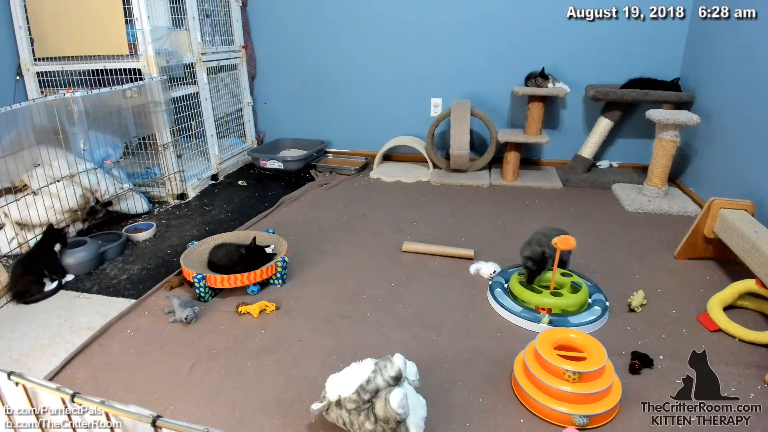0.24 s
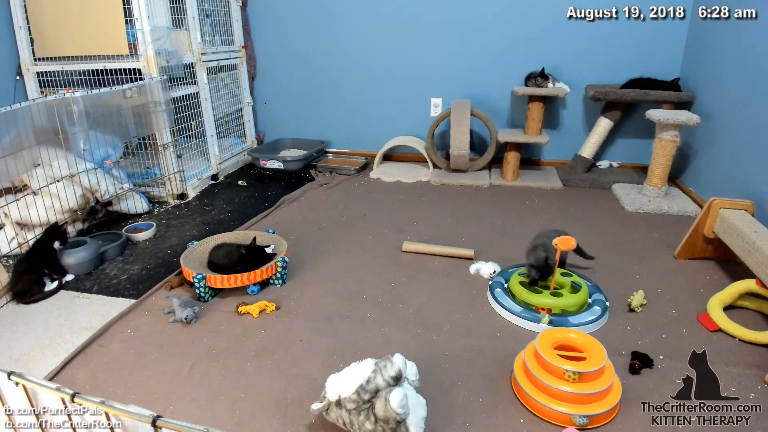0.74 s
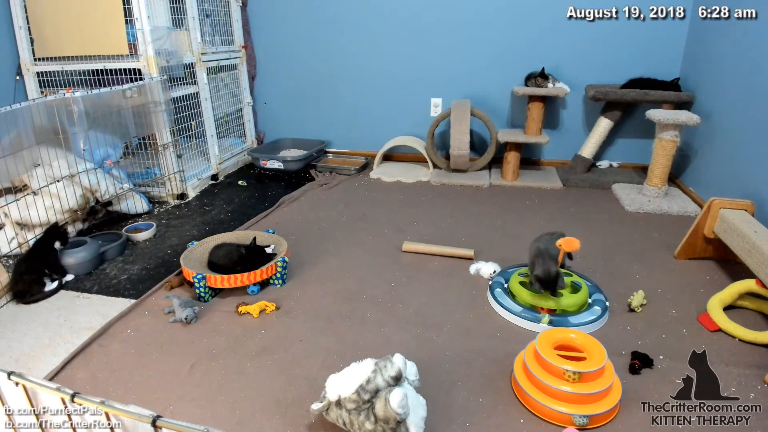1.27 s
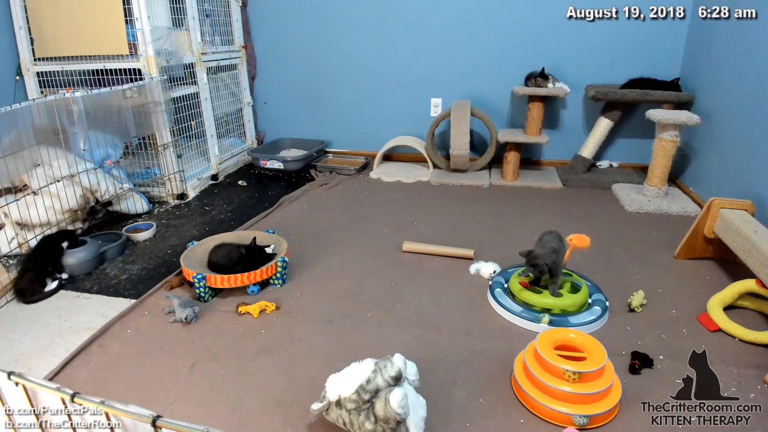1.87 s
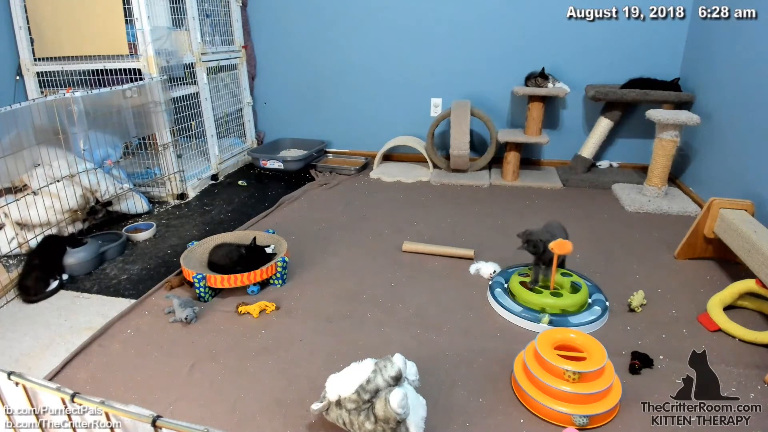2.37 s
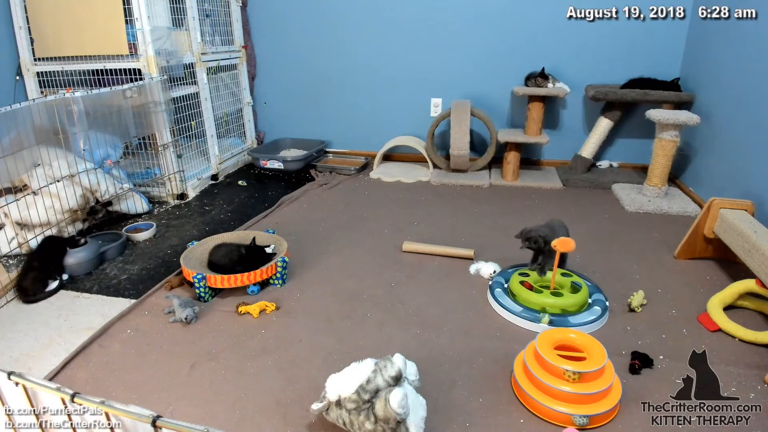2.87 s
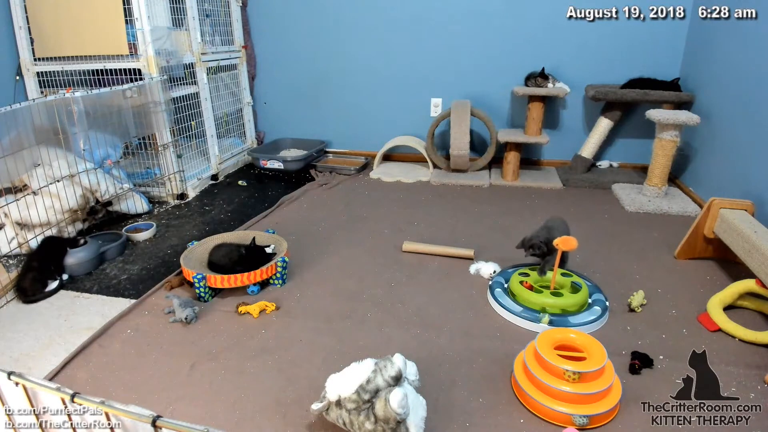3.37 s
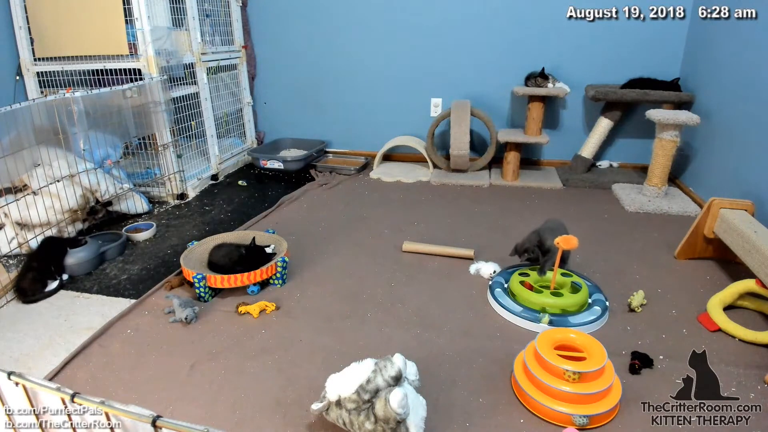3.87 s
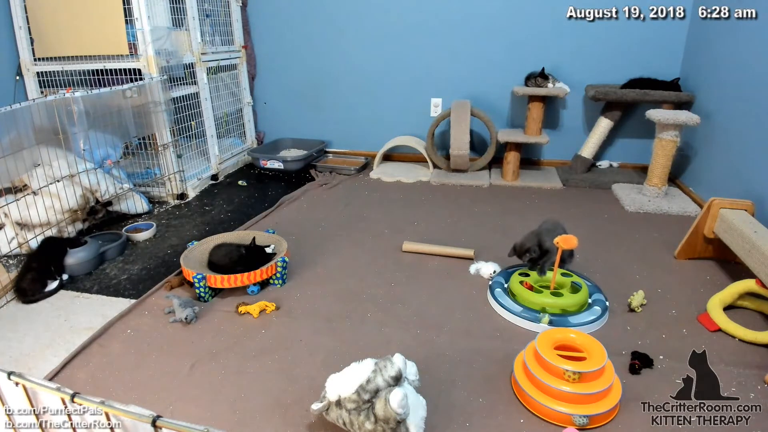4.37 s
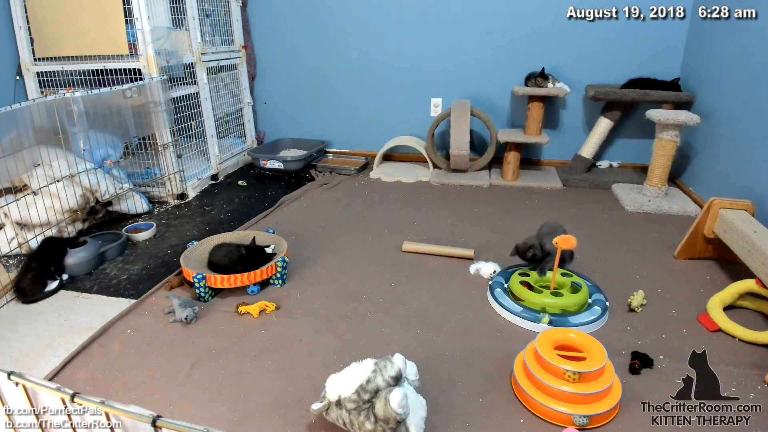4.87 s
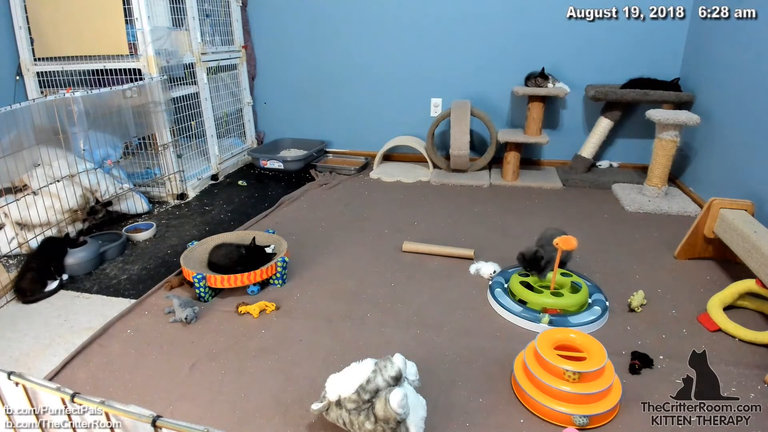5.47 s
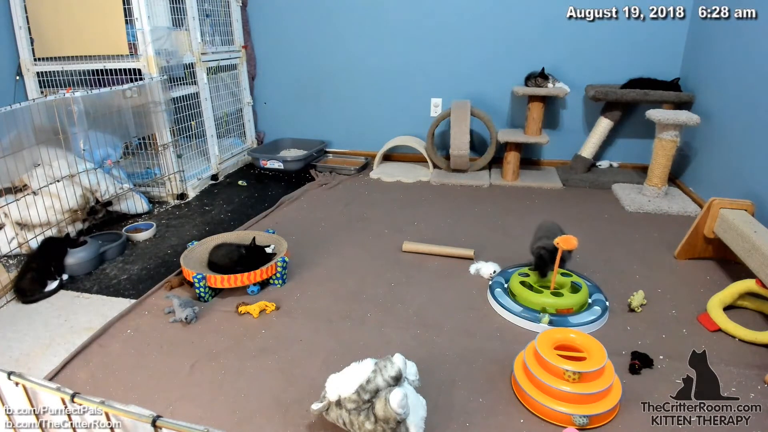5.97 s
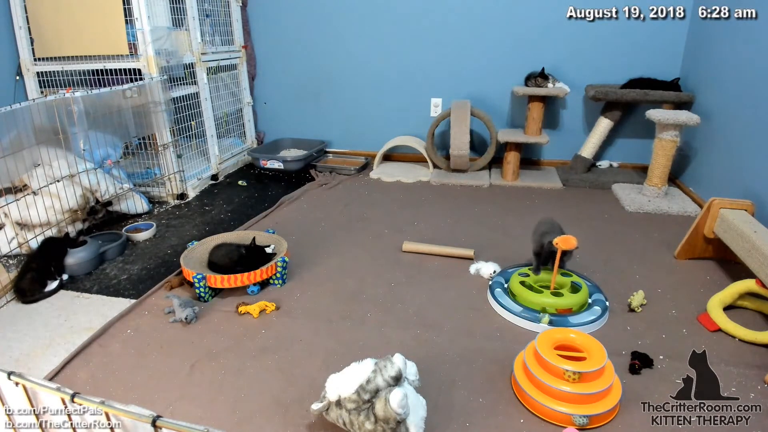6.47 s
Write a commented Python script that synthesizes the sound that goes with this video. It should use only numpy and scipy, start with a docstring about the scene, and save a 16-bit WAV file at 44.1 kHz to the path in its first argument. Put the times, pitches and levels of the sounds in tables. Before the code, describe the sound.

Soft, bass-heavy room hiss alone for about a second, then a kitten bats a hollow plastic ball around a toy track. Sharp pellet rattles, clacks and hollow knocks come fast, thin out to single ticks and stop. After a short pause a second flurry opens with a loud hollow knock, then fades. Small hard room with brief echoes, fixed microphone some distance away.

```python
"""Soft steady hiss, heaviest in the bass; then a kitten bats hollow plastic rattle balls round a toy's ring track.
The ball drums and knocks on the hollow track, and its loose pellet ticks against the shell: each contact
sets decaying sines ringing, some with a puff of noise. The toy's base drums on the floor.
The small hard-walled room adds brief echoes from looped delays; the hiss is shaped noise."""
import sys
import numpy as np
from scipy import signal
from scipy.fft import rfft, irfft, next_fast_len
from scipy.io import wavfile

SR = 44100
rng = np.random.default_rng(int(sys.argv[2]) if len(sys.argv) > 2 else 0)


def wrap_up_sound(samples):
    """Save the sound to the file named by the first command line argument, as 16-bit audio."""
    columns = np.atleast_2d(samples).T
    # keep every value between -1 and 1, then stretch to whole-number steps
    tamed = np.clip(columns, -1, 1)
    steps = np.round(tamed * 32767).astype(np.int16)
    wavfile.write(sys.argv[1], SR, steps)


def undo_db(level):
    """Turn decibels back into plain size, where 20 dB means ten times bigger."""
    steps = np.asarray(level, float) / 20
    return 10 ** steps


N = 296518

# ball against the track wall: (time [s], level [dB], favoured track pitch [Hz])
KNOCKS = [(1.203, -34, 900), (1.56, -22, 1680), (1.604, -29.5, 750), (1.798, -25.5, 2210),
          (1.945, -30, 970), (2.093, -37.5, 1070), (2.224, -31, 2060), (2.405, -29.5, 1070),
          (2.567, -36.5, 2280), (2.701, -32.5, 1120), (2.828, -40.5, 1110), (3.012, -47, 1160),
          (3.061, -23, 970), (4.204, -37.5, 980), (4.413, -33, 1850), (4.448, -9.5, 957),
          (4.553, -23, 1130), (4.721, -29.5, 1120), (4.8, -27, 1650), (4.921, -26, 790), (4.994, -25, 786),
          (5.125, -27, 870), (5.438, -34, 1100), (5.497, -35.5, 1070), (5.778, -48, 1070),
          (5.981, -34.5, 1080), (5.995, -19, 935), (6.166, -36, 1610), (6.481, -47, 1070),
          (6.689, -49, 853)]
FAST_RISE_DB_PER_S = 2600   # onset of struck rattles and of the chatter after a knock


def at_hz(points, hz):
    """Read a table on a log-frequency axis."""
    table_hz, value = np.transpose(points)
    return np.interp(np.log(hz), np.log(table_hz), value)


def in_time(rows):
    """Table columns joined by straight lines in time."""
    s, *columns = np.transpose(rows)
    return [np.interp(np.arange(N) / SR, s, column) for column in columns]


def band(x, low_hz, high_hz, order=2):
    """Band-pass."""
    sos = signal.butter(order, [low_hz, high_hz], "band", fs=SR, output="sos")
    return signal.sosfilt(sos, x + 1e-18)


def bursts(s, level_db, hold_s, rise_db_per_s, fall_db_per_s):
    """Rise, hold, fall: level of the loudest burst at each moment, and its index."""
    t = np.arange(0, N, 32)[:, None] / SR
    before_s = np.maximum(s - t, 0)
    after_s = np.maximum(t - s - hold_s, 0)
    each_db = level_db - rise_db_per_s * before_s - fall_db_per_s * after_s
    loudest_db, which = each_db.max(axis=1), each_db.argmax(axis=1)
    return np.repeat(loudest_db, 32)[:N], np.repeat(which, 32)[:N]


def scatter(moving, per_s, spread_db):
    """Random contacts with uneven sizes in dB, mean power 1 per second, kept while the ball moves."""
    at = np.flatnonzero(rng.random(N) < per_s / SR)
    size_db = spread_db * np.minimum(rng.exponential(1, len(at)), 4)
    power_per_s = np.sum(undo_db(2 * size_db)) / (N / SR)
    size_db = size_db - 10 * np.log10(power_per_s)
    kept = moving[at] > 0
    return at[kept], size_db[kept]


def facing(at, count):
    """As the ball turns, each mode faces the listener more or less: slow chance read at the contacts."""
    turn_per_s = 16
    knots = rng.standard_normal((count, int(N / SR * 40)))
    return np.transpose([np.interp(at / SR * turn_per_s, np.arange(len(row)), row) for row in knots])


def ring(clicks, hz, t60_s):
    """Two-pole resonator: a unit click sets a decaying sine of height 1 ringing."""
    r = undo_db(-60 / (t60_s * SR))
    w = 2 * np.pi * hz / SR
    return signal.lfilter([0, np.sin(w)], [1, -2 * r * np.cos(w), r * r], clicks + 1e-18)


def strike(at, level_db, modes, chance_db, split, favoured_hz=None, octave_db=0, turn_db=0):
    """Each contact rings each mode with a strength of its own, most near the favoured pitch."""
    out = np.zeros(N)
    luck = rng.standard_normal((len(at), len(modes)))
    turned = facing(at, count=len(modes))
    # the moulding is not quite round: each mode is a close trio and a contact finds one of the three
    member = rng.integers(-1, 2, (len(at), len(modes)))
    for k, (hz, mode_db, t60_s) in enumerate(modes):
        away_octaves = 0 if favoured_hz is None else np.abs(np.log2(hz / favoured_hz))
        strength_db = level_db + mode_db - octave_db * away_octaves
        strength_db = strength_db + chance_db * luck[:, k] + turn_db * turned[:, k]
        strength = (-1) ** k * undo_db(strength_db)
        for step in (-1, 0, 1):
            clicks = np.zeros(N)
            clicks[at] = strength * (member[:, k] == step)
            out += ring(clicks, hz * (1 + split * step), t60_s)
    return out


def snap(at, level_db, low_hz, high_hz, t60_s):
    """The many unresolved modes of a contact: a short decaying puff of noise."""
    clicks = np.zeros(N)
    clicks[at] = undo_db(2 * level_db)
    power = signal.lfilter([1], [1, -undo_db(-120 / (t60_s * SR))], clicks + 1e-18)
    return band(np.sqrt(power) * rng.standard_normal(N), low_hz, high_hz)


def hiss():
    """Steady room tone and microphone noise: white noise shaped in frequency, set by its rms."""
    # (frequency [Hz], relative level [dB])
    spectrum = [(15, -54), (32, -4.5), (44, 0.5), (58, -11), (91, -12), (173, -2.5), (378, -7.5), (410, -8),
                (722, -12), (782, -12), (970, -11.5), (1050, -13), (2170, -18.5), (4040, -22.5),
                (15500, -30)]
    level_db = -57.5
    hz = np.maximum(np.arange(N // 2 + 1) * SR / N, 1)
    noise = irfft(rfft(rng.standard_normal(N)) * undo_db(at_hz(spectrum, hz)), N)
    return undo_db(level_db) * noise / np.sqrt(np.mean(noise ** 2) + 1e-20)


def contact():
    """Level and favoured pitch on the track: rolling or the chatter after a knock, whichever is louder."""
    # ball rolling along the track: (time [s], level [dB], favoured track pitch [Hz])
    rolling = [(1.1, -63.5, 935), (1.24, -31.5, 1140), (1.42, -34.5, 1260), (1.5, -36.5, 795),
               (1.66, -44, 1090), (1.75, -47.5, 1590), (2.3, -50, 1200), (2.5, -61, 1000),
               (4.75, -73.5, 1480), (4.86, -33, 1580), (4.97, -37.5, 855), (5.22, -46.5, 980),
               (5.28, -37.5, 970), (5.46, -46, 1150), (5.62, -52, 1380), (5.72, -82, 1000),
               (6.12, -78, 1360), (6.22, -48.5, 1630), (6.4, -70, 1000)]
    roll_db, roll_hz = in_time(rolling)
    s, knock_db, knock_hz = np.transpose(KNOCKS)
    chatter_db, which = bursts(s, knock_db - 12, 0.01, FAST_RISE_DB_PER_S, fall_db_per_s=209)
    return np.maximum(roll_db, chatter_db), np.where(roll_db > chatter_db, roll_hz, knock_hz[which])


def track(moving, roll_db, favoured_hz):
    """The uneven ball drums finely on the hollow track as it rolls, and knocks on its wall."""
    # modes of the hollow track: (frequency [Hz], level [dB], t60 [s])
    track_modes = [(466, -2.5, 0.054), (672, -5.5, 0.066), (786, -2.5, 0.061), (885, -4, 0.067),
                   (1070, -3.5, 0.059), (1120, 0.5, 0.024), (1463, 1, 0.021), (1680, -11.5, 0.11),
                   (1792, -2, 0.025), (2210, 1.5, 0.027)]
    at, size_db = scatter(moving, per_s=1100, spread_db=2.1)
    level_db = size_db + roll_db[at]
    roll = strike(at, level_db + 18, track_modes, chance_db=3.0, split=0.017,
                  favoured_hz=favoured_hz[at], octave_db=7.0, turn_db=5.0)
    scrape = snap(at, level_db + 27, low_hz=900, high_hz=2790, t60_s=0.037)

    s, knock_db, knock_hz = np.transpose(KNOCKS)
    at = (s * SR).astype(int)
    knocks = strike(at, knock_db + 1.5, track_modes, chance_db=0.0, split=0.068,
                    favoured_hz=knock_hz, octave_db=35.5)
    puff = snap(at, knock_db - 14.5, low_hz=1295, high_hz=7770, t60_s=0.069)
    return band(roll + knocks, low_hz=152.5, high_hz=2530) + scrape + puff


def shell(at, level_db, favoured_hz, treble_db, chance_db, octave_db, turn_db):
    """The pellet rings the low shell modes; sharper contacts drive the treble modes and a puff harder."""
    # lower modes of the shell: (frequency [Hz], level [dB], t60 [s])
    low_modes = [(3018, -4.5, 0.14), (3316, 2.5, 0.038), (3510, 3.5, 0.011), (3810, 1, 0.055),
                 (4030, 1, 0.019), (4200, -4, 0.072), (4372, 2.5, 0.045), (4743, 0.5, 0.027),
                 (3850, 5, 0.00496)]
    # upper modes of the shell: (frequency [Hz], level [dB], t60 [s])
    high_modes = [(5290, -4, 0.026), (6040, -4, 0.017), (7293, -4.5, 0.059), (8480, -7.5, 0.063),
                  (9850, -6.5, 0.034), (13000, -17.5, 0.00915), (15000, -26.5, .015)]
    low = strike(at, level_db, low_modes, chance_db, split=0.0068,
                 favoured_hz=favoured_hz, octave_db=octave_db, turn_db=turn_db)
    high = strike(at, level_db + treble_db, high_modes, chance_db, split=0.011, turn_db=turn_db)
    puff = snap(at, level_db + treble_db + 12.0, low_hz=4660, high_hz=9300, t60_s=0.032)
    # a contact lasts a few cycles, so little spills outside the range of the modes
    low = band(low, low_hz=2674, high_hz=5600, order=3)
    high = band(high, low_hz=4530, high_hz=15400, order=3)
    return low + high + puff


def pellet(moving, roll_db):
    """Light ticks from each jolt until the pellet settles, and the hard blows on top."""
    # ball jolted, pellet thrown about: (time [s], rattle level [dB], tumbling time [s],
    # favoured shell pitch [Hz], air cavity level against the rattle [dB])
    jolts = [(1.14, -50, .04, 3600, -5), (1.202, -26.5, .03, 3550, -18), (1.237, -21, 0.016, 3530, -17),
             (1.2927, -27, .02, 3160, 10.5), (1.313, -22.5, 0.11, 3480, -10),
             (1.369, -22.5, 0.026, 3320, -15), (1.4476, -22.5, 0.048, 3540, 3),
             (1.5336, -29.5, 0.087, 3780, 7.5), (1.6065, -29, 0.11, 3930, -1),
             (1.789, -16.5, .035, 3430, -18), (1.8404, -26.5, 0.0041, 3830, -15),
             (1.8988, -25, 0.038, 3840, -10), (1.9623, -31, 0.086, 3630, -7), (2.073, -31, 0.045, 4200, 1),
             (2.1067, -29, 0.0097, 3600, -23), (2.195, -32, .02, 3940, 0.5),
             (2.2226, -28.5, 0.045, 3600, -0.5), (2.3261, -36, 0.054, 3830, 1),
             (2.42, -39.5, 0.031, 3700, -24), (2.53, -46, 0.15, 3600, -25), (2.663, -36, 0.028, 4050, -2),
             (2.7052, -24, 0.023, 4040, -16), (2.81, -33.5, 0.04, 4030, -10.5),
             (2.93, -45.5, 0.012, 4200, -11), (3.008, -25.5, 0.012, 4380, -16),
             (3.063, -37.5, 0.03, 3830, -18), (3.2583, -39.5, 0.0061, 4070, -29),
             (3.348, -48.5, 0.0084, 4030, -20), (4.141, -45.5, 0.027, 4500, -25),
             (4.221, -47, 0.0093, 4030, -2), (4.3955, -34.5, 0.074, 3970, -13.5),
             (4.438, -25.5, 0.105, 3630, -1.5), (4.545, -29.5, 0.016, 3600, 8.5),
             (4.6007, -33.5, 0.067, 3730, -22), (4.718, -29, 0.022, 4060, 2), (4.8, -33, 0.049, 3850, -2),
             (4.8486, -23.5, 0.028, 3650, 3), (4.9475, -27.5, 0.11, 4300, 8.5),
             (5.053, -26, 0.0089, 3700, 6.5), (5.12, -34, 0.24, 3600, -9),
             (5.2594, -27.5, 0.051, 3500, -0.5), (5.378, -33, 0.035, 3600, -12),
             (5.501, -38, 0.089, 3820, 7.5), (5.5704, -31.5, 0.063, 3740, 2.5),
             (5.68, -39.5, .03, 3830, -12), (5.799, -35.5, 0.014, 3500, -12),
             (5.9166, -32.5, 0.0067, 4000, -0.5), (5.977, -34, .03, 4100, 4),
             (6.0082, -29, 0.027, 3940, -3), (6.1387, -27, 0.03, 3840, -7), (6.23, -36.5, 0.062, 3840, 4.5),
             (6.36, -48, 0.029, 3900, 3), (6.478, -38.5, 0.048, 4200, 1.5),
             (6.608, -40, 0.0085, 3730, -3.5), (6.6697, -43, .04, 4370, -4.5)]
    # hard pellet blows: (time [s], level [dB], treble level against the blow [dB])
    hard_blows = [(1.2925, -24.5, -20), (1.3153, -25, -2.5), (1.369, -22.5, -27), (1.4505, -21, -30),
                  (1.7716, -23, -15.5), (1.791, -12.5, -24), (1.803, -20, -20), (1.8409, -7.5, -18.5),
                  (1.8997, -18.5, -11.5), (1.9623, -19.5, -20), (2.0736, -26, -26), (2.107, -15.5, -21.5),
                  (2.194, -31.5, -11), (2.2246, -24, -17), (2.3256, -26, -15), (2.7054, -19, -21.5),
                  (2.72, -23, -21), (3.0083, -27, -13), (3.064, -45, -19), (3.258, -33.5, -28),
                  (4.142, -53, 1.5), (4.4357, -22, -23), (4.4688, -20, -30), (4.6001, -24.5, -25),
                  (4.684, -30.5, -14), (4.7208, -24.5, -34), (4.849, -19, -19), (4.946, -18, -12.5),
                  (4.961, -22.5, -8.5), (5.055, -26, -31), (5.238, -29, -16.5), (5.2614, -22.5, -13.5),
                  (5.5714, -35, -16), (5.5884, -29, -25), (5.8015, -40, -19), (5.9178, -32, -17),
                  (5.9753, -36, -15), (6.0246, -26, -32), (6.137, -28.5, -17), (6.1542, -21.5, -30),
                  (6.184, -30, -33), (6.249, -51, -30), (6.669, -41.5, -21)]
    # treble of the light ticks against the rattle, at a brisk roll: (time [s], level [dB])
    tick_treble = [(1.19, -16), (1.33, -6.5), (1.48, -11), (1.7, -6), (1.8, -14), (2.1, -10), (2.4, -2.5),
                   (2.58, -17), (2.75, -14.5), (3.05, -7.5), (3.3, -14), (4.15, 4), (4.24, -16.5),
                   (4.45, -12), (4.8, -9.5), (5.0, -6), (5.3, -10), (5.65, -8), (6.0, -12), (6.2, -10),
                   (6.5, -20.5), (6.72, -20)]
    # air inside the ball, heard when its slot is open: (frequency [Hz], level [dB], t60 [s])
    cavity_modes = [(3034, 3.5, 0.036)]
    same_moment_s, gentle_rise_db_per_s = 0.006, 510
    brisk_roll_db, treble_db_per_roll_db = -38, 0.22
    lively_db, focus_db_per_octave, focus_growth = -34, 17, 1.5

    s, jolt_db, tumble_s, shell_hz, cavity_db = np.transpose(jolts)
    blow_s, blow_db, blow_treble_db = np.transpose(hard_blows)
    # a jolt with no blow at its start swells
    struck = np.abs(s[:, None] - blow_s).min(axis=1) < same_moment_s
    rise_db_per_s = np.where(struck, FAST_RISE_DB_PER_S, gentle_rise_db_per_s)
    rattle_db, which = bursts(s, jolt_db, tumble_s, rise_db_per_s, fall_db_per_s=300.5)

    at, size_db = scatter(moving, per_s=400, spread_db=0.0)
    level_db = size_db + rattle_db[at]
    # ticks are sharper while the ball works the track hard
    briskness_db = np.maximum(roll_db[at], -70.0) - brisk_roll_db
    treble_db = in_time(tick_treble)[0][at] + treble_db_per_roll_db * briskness_db
    # a lazy pellet keeps to one spot and rings fewer modes
    focus_db = focus_db_per_octave + focus_growth * np.clip(lively_db - rattle_db[at], 0, 40)
    ticks = shell(at, level_db + 16, shell_hz[which[at]], treble_db,
                  chance_db=4.5, octave_db=focus_db, turn_db=5.0)
    hollow = strike(at, level_db + cavity_db[which[at]] + 20.5, cavity_modes, chance_db=1.5, split=0.0068)

    at = (blow_s * SR).astype(int)
    blow_hz = shell_hz[which[at + int(same_moment_s * SR)]]
    blows = shell(at, blow_db, blow_hz, blow_treble_db, chance_db=2.5, octave_db=41.5, turn_db=3)
    return ticks + band(hollow, low_hz=2830, high_hz=3600) + blows


def base(moving):
    """Rolling weight shakes the two low modes of the base plate against the floor."""
    # base drumming on the floor: (time [s], level [dB], length [s])
    drumming = [(1.32, -42, 0.22), (1.923, -49.5, 0.017), (2.063, -53, 0.018), (4.446, -54, .02),
                (5.97, -55, 0.024)]
    # modes of the base plate: (frequency [Hz], level [dB], t60 [s])
    base_modes = [(188, -6, 0.039), (341.4, -2.5, 0.14)]
    at, size_db = scatter(moving, per_s=500, spread_db=1.5)
    drum_db, _ = bursts(*np.transpose(drumming), rise_db_per_s=303, fall_db_per_s=137)
    drum = strike(at, size_db + drum_db[at] + 20.5, base_modes, chance_db=0.5, split=0.008)
    return band(drum, low_hz=131, high_hz=700)


def room(x):
    """Twelve echo paths between the walls, dying band by band, smeared by three all-passes."""
    # (frequency [Hz], t60 [s])
    decay = [(300, 0.1), (1000, 0.12), (3500, 0.13), (9000, 0.12)]
    size = next_fast_len(N + SR // 2)
    hz = np.maximum(np.arange(size // 2 + 1) * SR / size, 1)
    t60_s = at_hz(decay, hz)
    paths = 0
    for k, lag_s in enumerate(np.geomspace(.0113, .0379, 12)):
        loop = undo_db(-60 * lag_s / t60_s) * np.exp(-2j * np.pi * hz * lag_s)
        paths = paths + (-1) ** k * loop / (1 - loop)
    for lag_s in (.0013, .0029, .0047):
        delay = np.exp(-2j * np.pi * hz * lag_s)
        paths = paths * (delay - .6) / (1 - .6 * delay)
    paths = paths / np.sqrt(np.mean(np.abs(paths) ** 2))
    return irfft(rfft(x, size) * paths, size)[:N]


def scene():
    """Ball, track and base, their echoes and the room tone."""
    # spells in which the ball moves: (start [s], end [s])
    in_play = [(1.1, 3.5), (4.1, 6.8)]
    room_db = -6
    t = np.arange(N) / SR
    moving = sum((t >= start) & (t <= end) for start, end in in_play)
    roll_db, track_hz = contact()
    toy = pellet(moving, roll_db) + track(moving, roll_db, track_hz) + base(moving)
    return (toy + undo_db(room_db) * room(toy) + hiss())[None]


def roll_off(x):
    """The treble ends steeply here."""
    return signal.sosfilt(signal.butter(12, 15790, fs=SR, output="sos"), x)


def record(dry):
    """A steep low-pass cuts the top, 60 dB down from 16050 Hz."""
    sos = signal.cheby2(14, 60, 16050, fs=SR, output="sos")
    mix = signal.sosfilt(sos, dry)
    return roll_off(mix)


dry = scene()
out = record(dry)
wrap_up_sound(out)
```